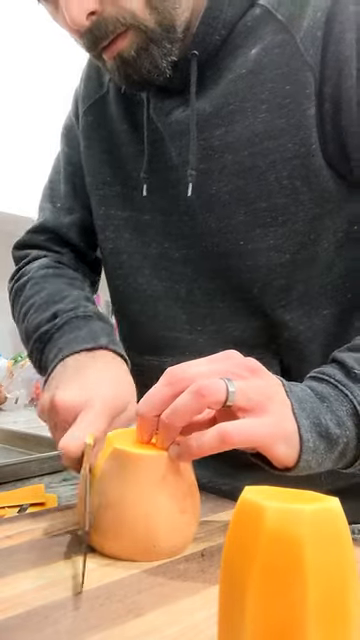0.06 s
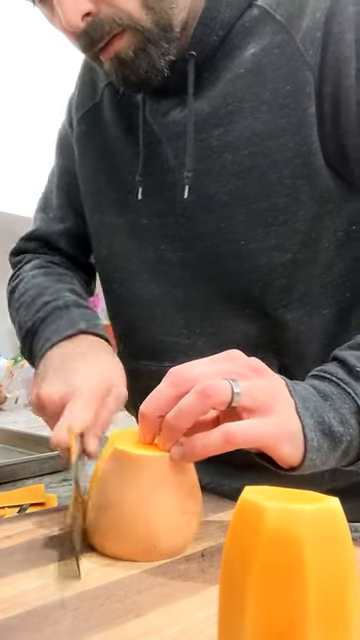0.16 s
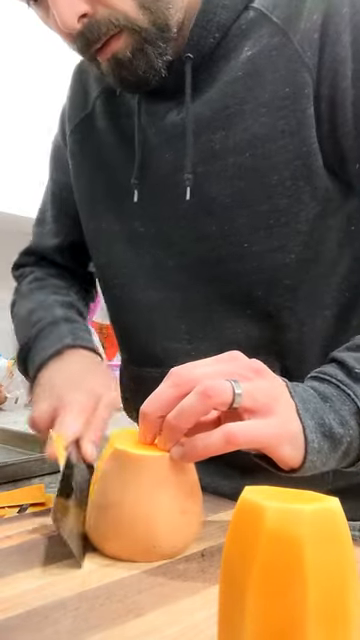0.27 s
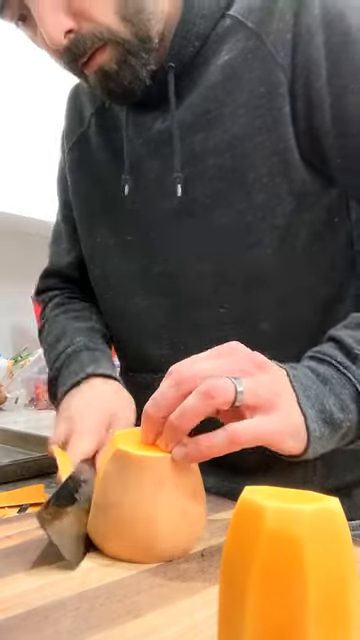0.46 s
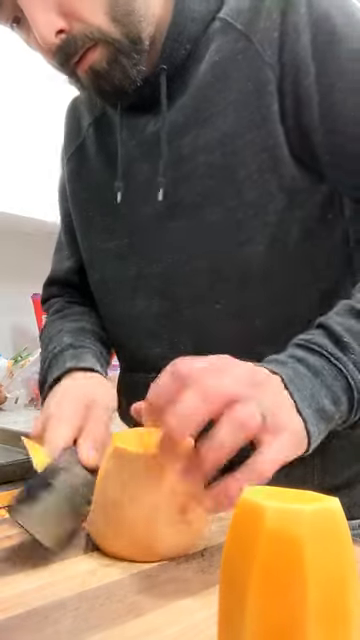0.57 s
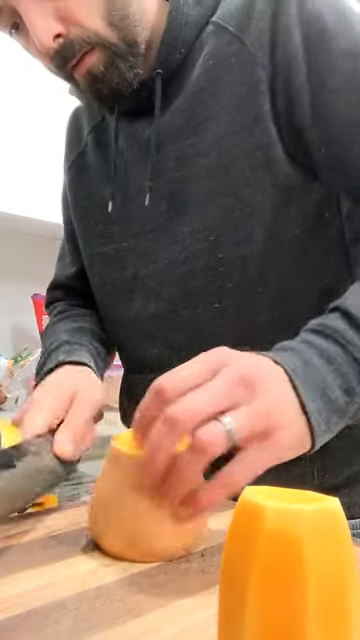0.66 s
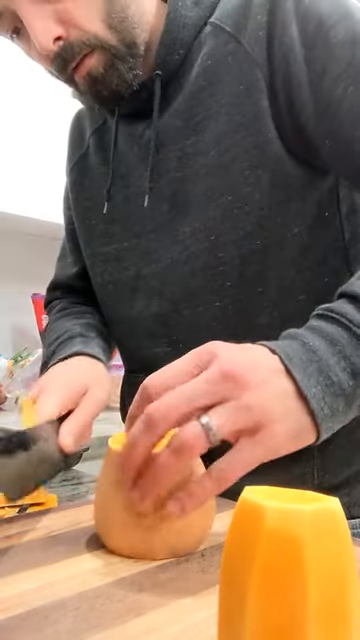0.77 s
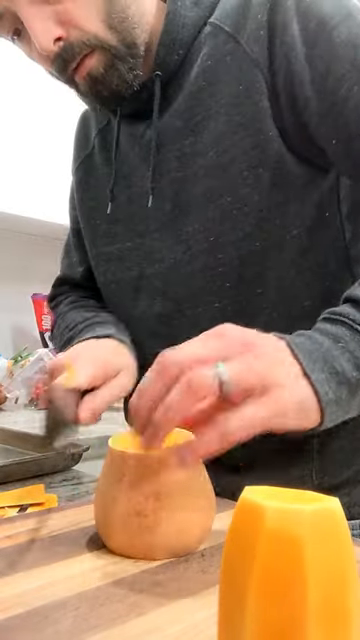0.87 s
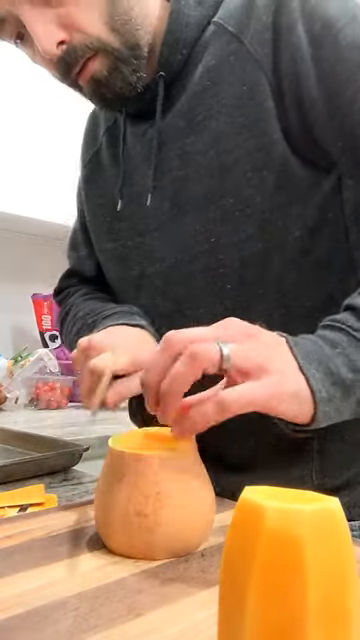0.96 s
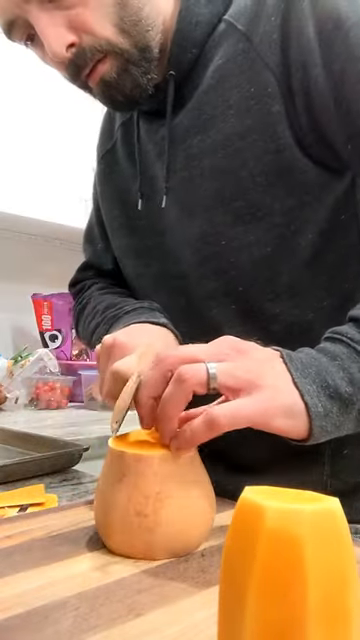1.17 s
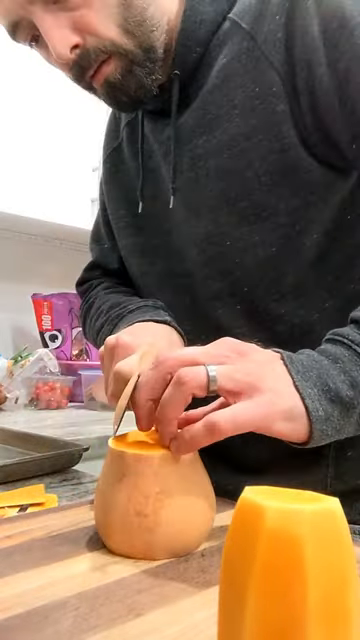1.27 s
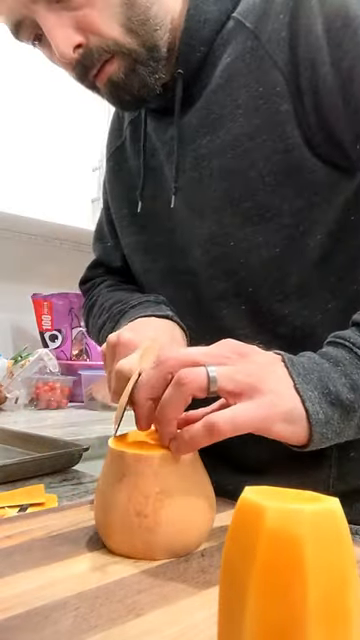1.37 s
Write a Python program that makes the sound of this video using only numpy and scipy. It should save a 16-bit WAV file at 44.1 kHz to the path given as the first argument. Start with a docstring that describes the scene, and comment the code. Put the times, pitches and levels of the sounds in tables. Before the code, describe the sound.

Close up in a quiet kitchen, a knife cuts down through squash peel and lands on a wooden board with one sharp knock. A short, gritty scrape follows, then soft low thumps and faint rustling as the squash is handled.

```python
"""A quiet kitchen, one microphone close to a wooden board where a chef's knife pares a butternut squash.
The blade hisses down through the flesh, knocks on the board, then scrapes sideways in a run of crisp
slips as it pushes the peel away. The squash is turned and bumps dully, booming in the counter; hands
and sleeves rustle. A short reverberation and a low room tone lie behind it all."""
import sys
import numpy as np
from scipy import signal
from scipy.fft import rfft, irfft
from scipy.io import wavfile

SR = 44100
rng = np.random.default_rng(int(sys.argv[2]) if len(sys.argv) > 2 else 0)


def int16_out(signal):
    """Quantize to a 16-bit WAV file."""
    q = np.round(np.clip(np.atleast_2d(signal).T, -1, 1) * 32767)
    wavfile.write(sys.argv[1], SR, q.astype(np.int16))


N = 61739
TIME = np.arange(N) / SR

# The edge lands on the board, later touches it again.
# Each row: start in seconds, impulse in dB, contact time in seconds.
CHOPS = [(0.2649, -19, .00076), (0.5155, -51, .0006)]
# The wooden board's modes. Each row: frequency in Hz, gain in dB, T60 in seconds.
BOARD_MODES = [(299.6, -12.5, 0.094), (422, -6, 0.06), (559.7, -11, 0.077), (754, 4, 0.019),
               (837, -13.5, 0.2), (1082.5, 3, 0.083), (1198.6, 1.5, 0.063), (1610, -0.5, 0.031),
               (2372, 2.5, 0.047)]
# The knock reaches the microphone off the nearest surfaces. Each row: delay in seconds, gain in dB.
NEAR_ECHOES = [(.007, -9), (0.0132, -15.5)]
BOARD_RADIATES_HZ = 324  # slower motion hardly moves the air

# The edge catches and slips on the board. Each row: start in seconds, level in dB, decay in seconds.
SLIPS = [(0.3345, -35, 0.0052), (0.3424, -26.5, 0.0057), (0.3533, -30, 0.0092), (0.3655, -34, 0.0057),
         (0.366, -52, 0.0041), (0.372, -48, 0.0056), (0.3833, -35.5, .005), (0.3862, -35.5, 0.014),
         (0.395, -37.5, 0.0054), (0.403, -50, 0.0079), (0.415, -35.5, 0.0033), (0.5113, -48.5, 0.0085)]
# The colour of the scrape. Each row: frequency in Hz, relative level in dB.
SCRAPE_SPECTRUM = [(300, -3), (1200, -1.5), (2000, -13.5), (2400, -3), (3000, -8), (3900, -3), (5800, -10),
                   (6800, -0.5), (8100, -4), (10500, 5), (13600, -6), (15000, -3.5)]
# The blade's modes. Each row: frequency in Hz, gain in dB, T60 in seconds.
BLADE_MODES = [(7026, -2, 0.024), (9340, -11.5, 0.014), (10240, 7.5, 0.0056), (10400, -3.5, 0.004)]
SLIP_ATTACK_S, BLADE_RING_DB = .0007, -10

# The blade slides through the flesh.
# Each row: start in seconds, length in seconds, starting level in dB, swell in dB per second.
CUTS = [(-0.01, 0.071, -54.5, -75.5), (0.097, 0.075, -85, -6), (0.2, 0.067, -51.5, 51.5)]
# The hiss of the cut. Each row: frequency in Hz, relative level in dB.
FLESH_SPECTRUM = [(300, 0), (900, -6.5), (1700, -0.5), (3300, -5.5), (4900, -0.5), (5700, -14.5),
                  (6900, 1.5), (8000, -6), (9800, 1), (11800, -3), (12900, -7), (15000, -9.5)]
CUT_ATTACK_S, CUT_RELEASE_S = 0.018, .008

# Knife and squash push softly on the counter.
# Each row: start in seconds, impulse in dB, contact time in seconds.
BUMPS = [(0.0, -61.5, 0.0022), (0.082, -47.5, 0.017), (0.204, -39.5, 0.015), (0.213, -43.5, .005),
         (0.271, -37, 0.0084), (0.43, -46, 0.011), (0.513, -57, 0.0037), (0.524, -38.5, 0.014),
         (0.584, -52.5, 0.0037), (0.622, -36, 0.021), (0.76, -46, 0.015), (0.844, -36, 0.013),
         (0.867, -43, 0.0046), (0.889, -47.5, 0.0066), (0.935, -43, 0.0023), (0.956, -42, 0.0039),
         (0.987, -43.5, 0.0066)]
# The counter's modes. Each row: frequency in Hz, gain in dB, T60 in seconds.
COUNTER_MODES = [(37.08, -4, 0.19), (75.6, 12.5, 0.14), (86.3, 9.5, .13), (129.6, 10, 0.096),
                 (167.5, 4.5, 0.11), (251, -1.5, 0.079)]
TREMOR_PEAK_S, TREMOR_WIDTH_S, TREMOR_DB = .5, 0.12, -57.5

# The peel rubs over the board. Each row: peak time in seconds, half width in seconds, level in dB.
PEEL_RUBS = [(0.423, 0.0092, -53), (0.491, 0.045, -64.5), (0.5165, 0.0016, -61), (0.565, 0.012, -50.5),
             (0.608, 0.0059, -61.5)]
# The colour of the peel's rustle. Each row: frequency in Hz, relative level in dB.
PEEL_SPECTRUM = [(300, -2), (750, -6), (1400, -1.5), (2000, -2), (2550, -0.5), (3500, -9), (5700, -13.5),
                 (10000, -12), (15000, -19)]
# Sleeve and hand brush past as the squash is turned.
# Each row: peak time in seconds, half width in seconds, level in dB.
SLEEVE_SWISHES = [(0.725, 0.048, -73), (0.853, 0.019, -74), (0.897, 0.015, -62), (0.945, 0.022, -65.5)]
# The hollow colour of the sleeve. Each row: frequency in Hz, relative level in dB.
SLEEVE_SPECTRUM = [(300, 6.5), (450, 3.5), (750, -4.5), (1120, 6.5), (1400, -6), (1680, 2.5), (2050, -11.5),
                   (2450, 0), (2800, -12.5), (3100, -5.5), (3500, -11), (6000, -16.5), (6900, -9),
                   (7800, -18.5), (10000, -10.5), (15000, -23)]

# The quiet of the kitchen. Each row: frequency in Hz, relative level in dB.
ROOM_TONE_SPECTRUM = [(25, -4.5), (55, -1), (90, -17), (130, -3.5), (200, -14.5), (400, -31), (1200, -35.5),
                      (4000, -43.5), (8000, -48.5), (15000, -52.5)]
ROOM_TONE_DB = -64.5
ROOM_T60_S, ROOM_TREBLE_T60_S, ROOM_SPLIT_HZ = .48, 0.22, 5000
ROOM_GAP_S, ROOM_BUILD_S = .005, 0.0031
CHOP_ROOM_DB, SCRAPE_ROOM_DB, SOFT_ROOM_DB = -16, -14.5, -13
CUTOFF_HZ = 15900


def chop():
    """The edge strikes the board: a crack and a short wooden ring, thickened by close echoes."""
    force = pushes(CHOPS)
    wood = sum(from_db(db) * ring(force, hz, t60) for hz, db, t60 in BOARD_MODES)
    wood = signal.sosfilt(signal.butter(2, BOARD_RADIATES_HZ, "high", fs=SR, output="sos"), wood)
    echoes = sum(from_db(db) * np.interp(TIME - delay, TIME, wood, left=0) for delay, db in NEAR_ECHOES)
    return wood + echoes


def scrape():
    """Each slip of the edge sheds a dying burst of clicks, which also rings the blade."""
    level = 0
    for start, db, decay_s in SLIPS:
        age = np.maximum(TIME - start, 0)
        level += from_db(db) * np.minimum(age / SLIP_ATTACK_S, 1) * np.exp(-age / decay_s)
    grit = level * coloured(grains(per_s=35000, spread_db=2.5), SCRAPE_SPECTRUM)
    blade = from_db(BLADE_RING_DB) * grit.std() * unit_rms(struck(grit, BLADE_MODES))
    return grit + blade


def slicing():
    """Cells of the squash burst in a fine hiss for as long as the blade moves."""
    level = 0
    for start, length, db, swell_db_per_s in CUTS:
        age = TIME - start
        swell = from_db(db + swell_db_per_s * np.clip(age, 0, length))
        attack = np.clip(age / CUT_ATTACK_S, 0, 1)
        release = np.exp(-np.maximum(age - length, 0) / CUT_RELEASE_S)
        level += swell * attack * release
    return level * coloured(grains(per_s=28000, spread_db=1), FLESH_SPECTRUM)


def counter():
    """The counter booms under each bump; working hands add a faint tremor that swells and fades."""
    effort = bell(TREMOR_PEAK_S, TREMOR_WIDTH_S)
    tremor = from_db(TREMOR_DB) * effort * unit_rms(struck(rng.standard_normal(N), COUNTER_MODES))
    return struck(pushes(BUMPS), COUNTER_MODES) + tremor


def brushing(strokes, spectrum):
    """Peel or sleeve rubs lightly: a rustle of tiny contacts rises and falls with each stroke."""
    level = sum(from_db(db) * bell(peak, width) for peak, width, db in strokes)
    return level * coloured(grains(per_s=8700, spread_db=2), spectrum)


def kitchen_reverb(x):
    """Diffuse reflections from farther off in the kitchen; their treble dies first."""
    noise = rng.standard_normal(N)
    low = signal.sosfilt(signal.butter(2, ROOM_SPLIT_HZ, fs=SR, output="sos"), noise)
    high = signal.sosfilt(signal.butter(2, ROOM_SPLIT_HZ, "high", fs=SR, output="sos"), noise)
    tail = low * from_db(-60 * TIME / ROOM_T60_S) - high * from_db(-60 * TIME / ROOM_TREBLE_T60_S)
    tail *= np.clip((TIME - ROOM_GAP_S) / ROOM_BUILD_S, 0, 1)
    return signal.fftconvolve(x, tail / np.linalg.norm(tail))[:N]


def room_tone():
    """The kitchen's background: a faint, steady noise, mostly bass."""
    return from_db(ROOM_TONE_DB) * coloured(rng.standard_normal(N), ROOM_TONE_SPECTRUM)


def pushes(contacts):
    """A rounded pulse of force for each contact; longer contacts are duller."""
    force = np.zeros(N)
    for start, db, contact_s in contacts:
        pulse = np.sin(np.pi * np.clip((TIME - start) / contact_s, 0, 1)) ** 2
        force += from_db(db) * pulse / (pulse.sum() + 1e-12)
    return force


def struck(force, modes):
    """A body's modes ring in parallel, with alternating signs."""
    return sum((-1) ** k * from_db(db) * ring(force, hz, t60) for k, (hz, db, t60) in enumerate(modes))


def ring(force, hz, t60):
    """One mode: a unit click starts a dying sine of height 1."""
    radius, angle = from_db(-60 / (t60 * SR)), 2 * np.pi * hz / SR
    return signal.lfilter([0, np.sin(angle)], [1, -2 * radius * np.cos(angle), radius ** 2], force + 1e-18)


def grains(per_s, spread_db):
    """Tiny clicks of uneven size at random moments."""
    clicks = (rng.random(N) < per_s / SR) * rng.choice([-1, 1], N)
    return clicks * from_db(spread_db * np.clip(rng.standard_normal(N), -2, 2))


def coloured(x, spectrum):
    """Give a steady texture a spectrum, at unit rms."""
    hz, db = np.transpose(spectrum)
    bin_hz = np.maximum(np.fft.rfftfreq(N, 1 / SR), 1)
    gain = from_db(np.interp(np.log(bin_hz), np.log(hz), db))
    bass_rolloff = np.minimum(bin_hz / hz[0], 1) ** 2
    return unit_rms(irfft(rfft(x) * gain * bass_rolloff, N))


def bell(peak_s, width_s):
    """A Gaussian swell of height 1."""
    return np.exp(-.5 * ((TIME - peak_s) / width_s) ** 2)


def from_db(db):
    """Decibels to gain."""
    return 10 ** (np.asarray(db) / 20)


def unit_rms(x):
    """Scale to unit rms."""
    return x / np.sqrt(np.mean(x ** 2) + 1e-20)


def scene():
    """Knife, board and counter close to the microphone, with the room behind them."""
    knock, grit = chop(), scrape()
    soft = slicing() + brushing(PEEL_RUBS, PEEL_SPECTRUM)
    soft += brushing(SLEEVE_SWISHES, SLEEVE_SPECTRUM) + counter()
    send = from_db(CHOP_ROOM_DB) * knock + from_db(SCRAPE_ROOM_DB) * grit + from_db(SOFT_ROOM_DB) * soft
    return (knock + grit + soft + kitchen_reverb(send) + room_tone())[None]


def record(dry):
    """The microphone's mono signal, with the highest treble cut steeply."""
    return signal.sosfilt(signal.ellip(10, .2, 80, CUTOFF_HZ, fs=SR, output="sos"), dry)


dry = scene()
out = record(dry)
int16_out(out)
```